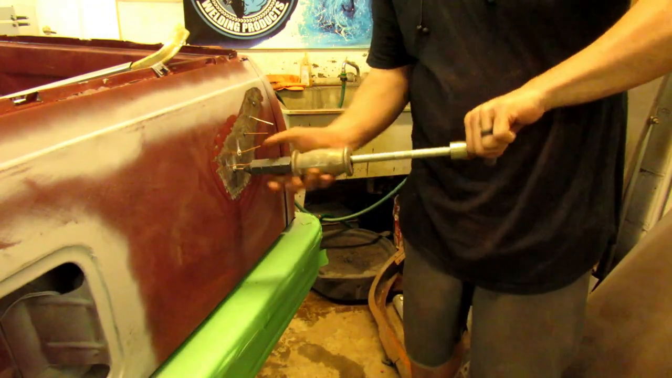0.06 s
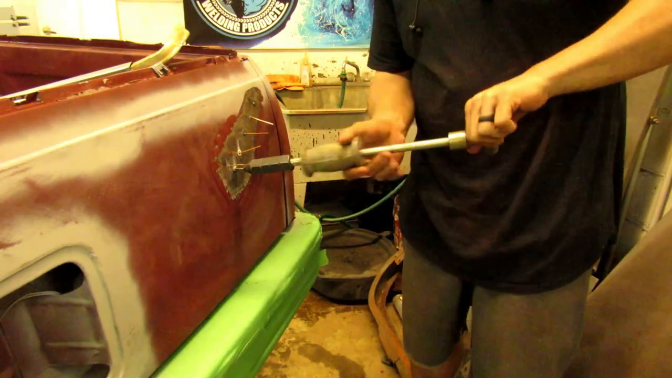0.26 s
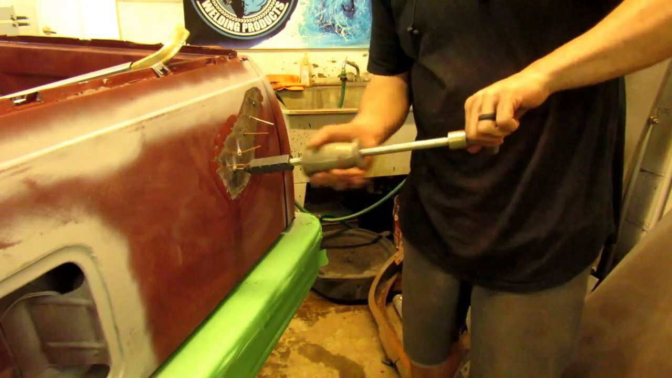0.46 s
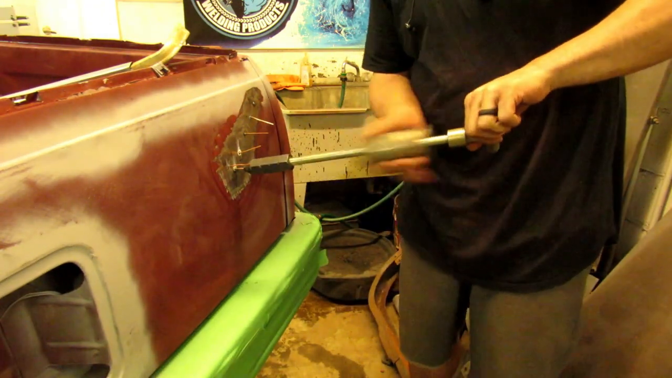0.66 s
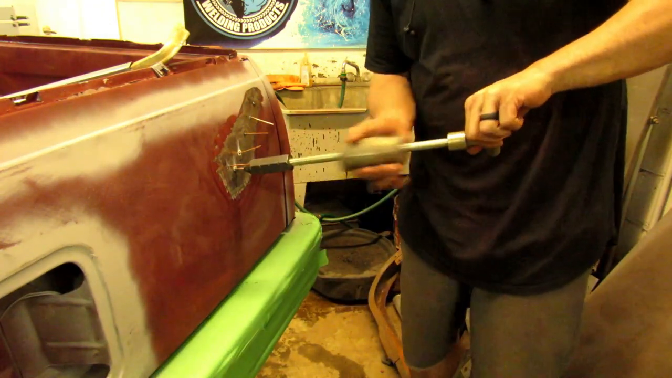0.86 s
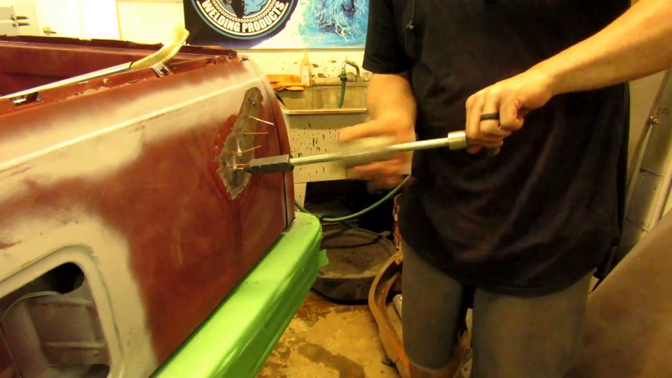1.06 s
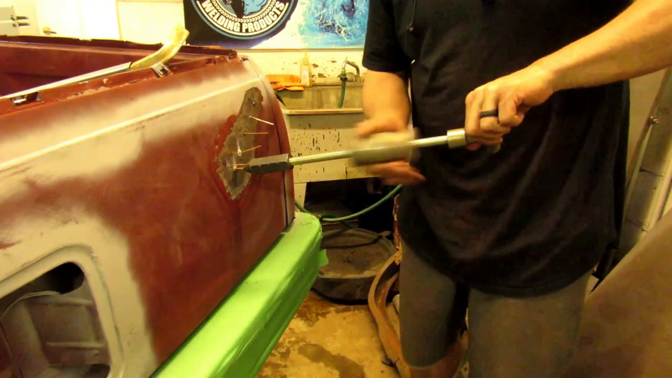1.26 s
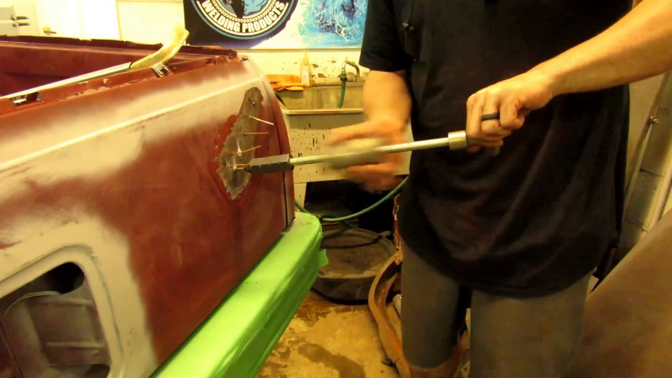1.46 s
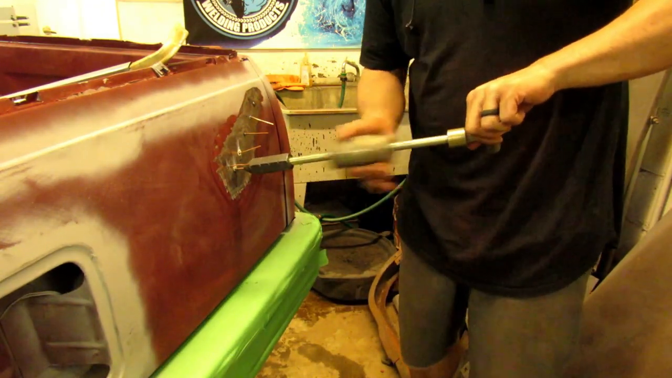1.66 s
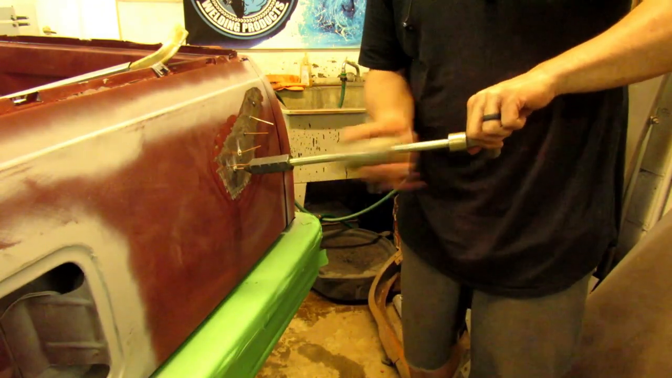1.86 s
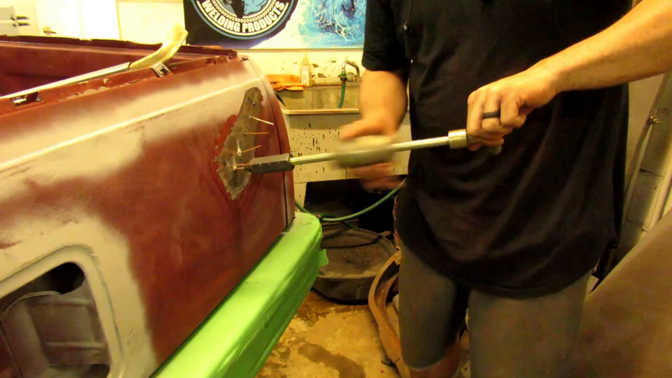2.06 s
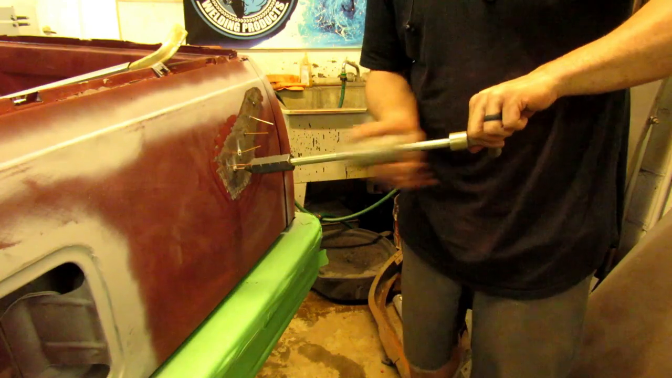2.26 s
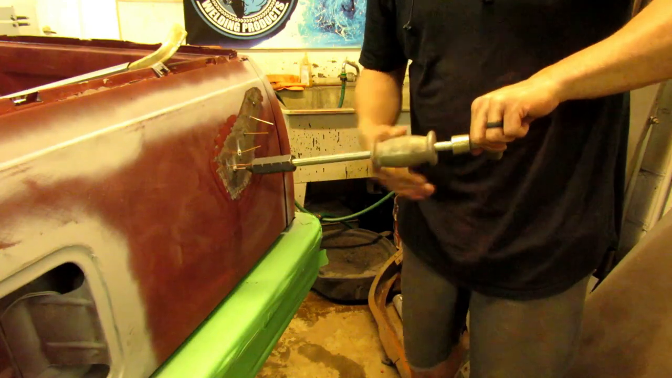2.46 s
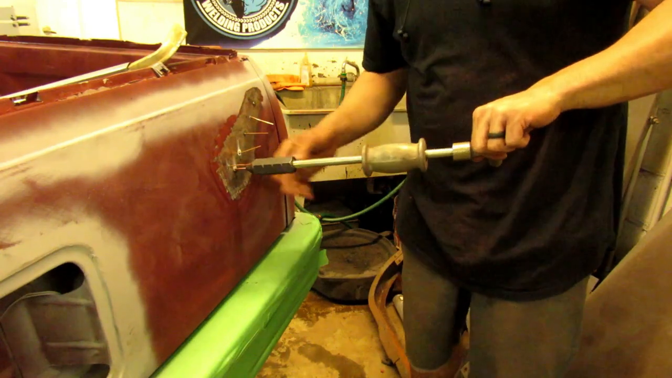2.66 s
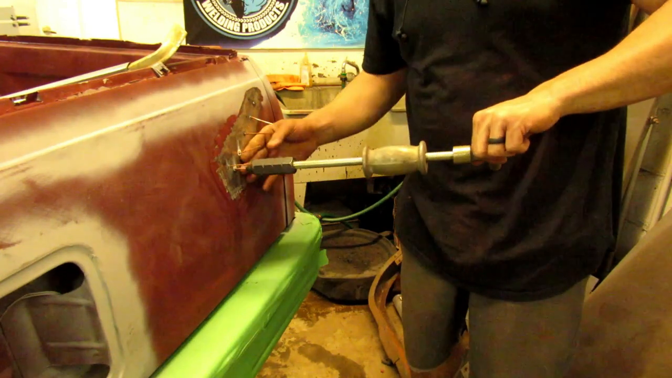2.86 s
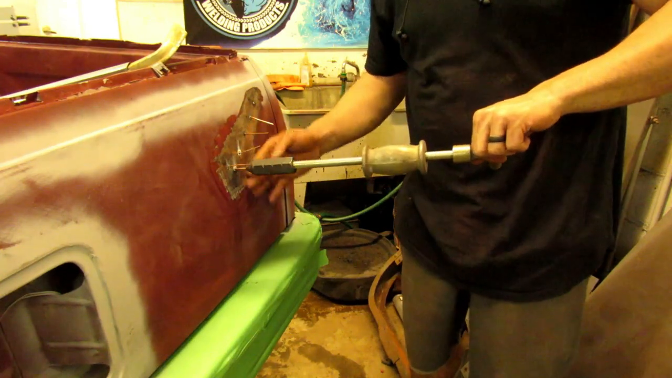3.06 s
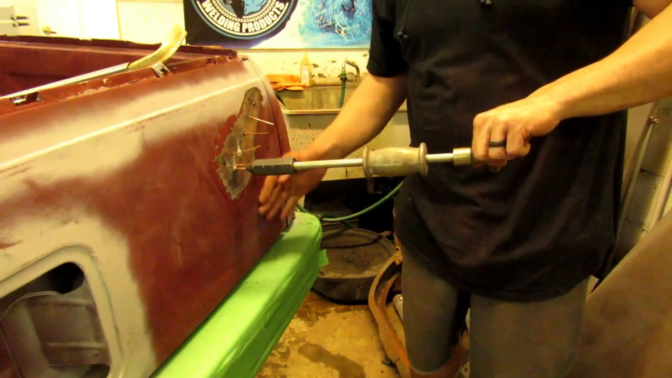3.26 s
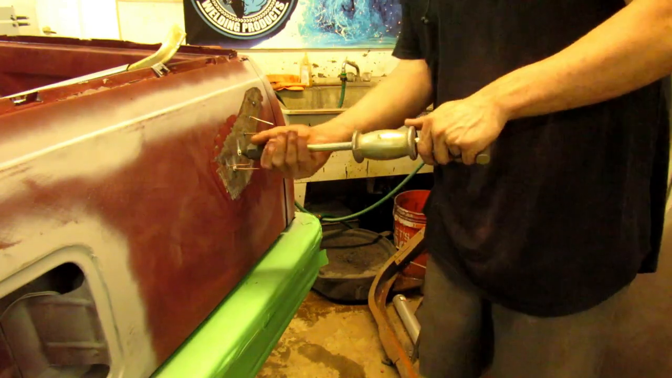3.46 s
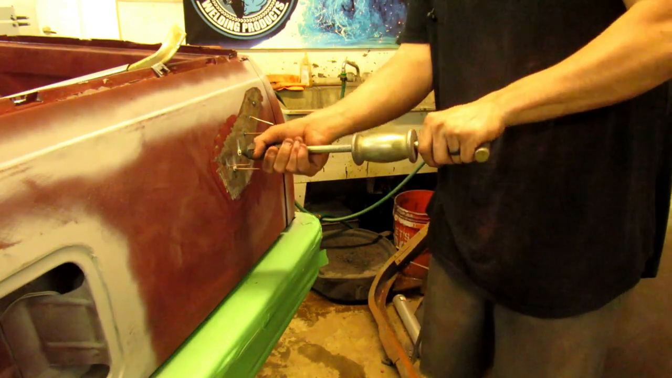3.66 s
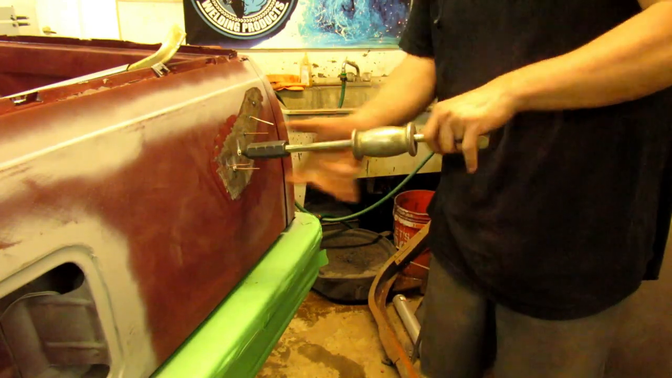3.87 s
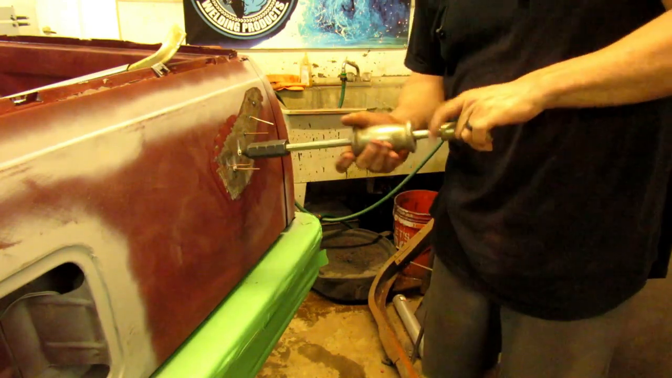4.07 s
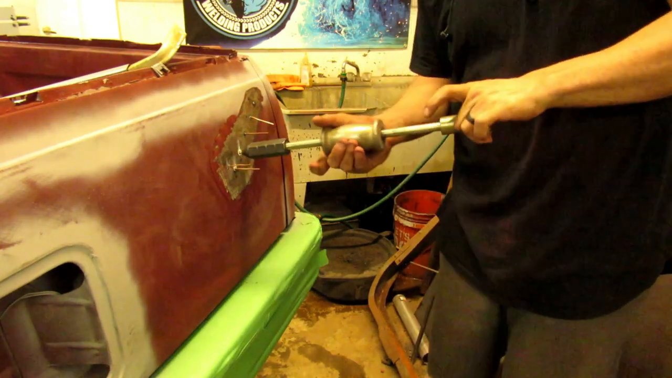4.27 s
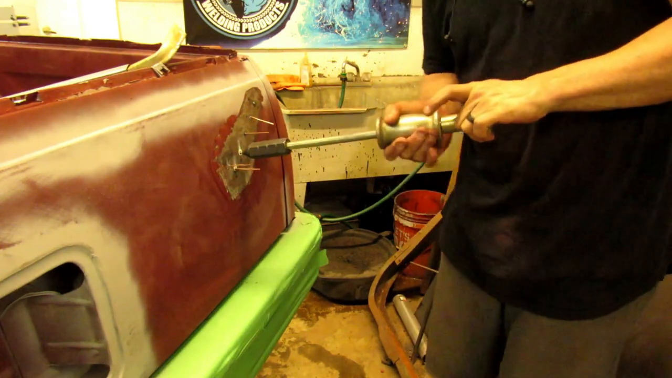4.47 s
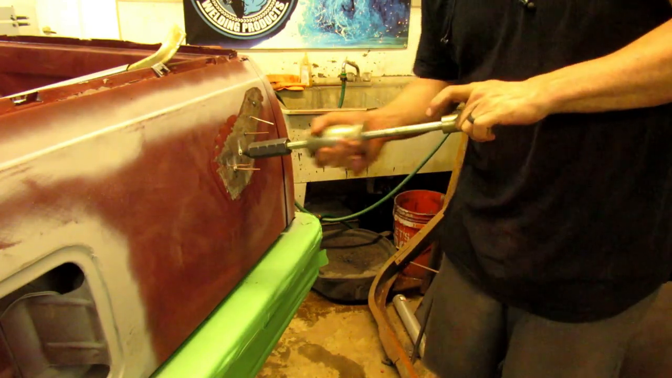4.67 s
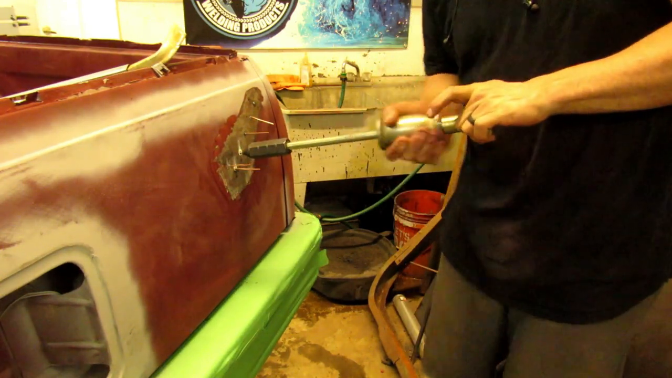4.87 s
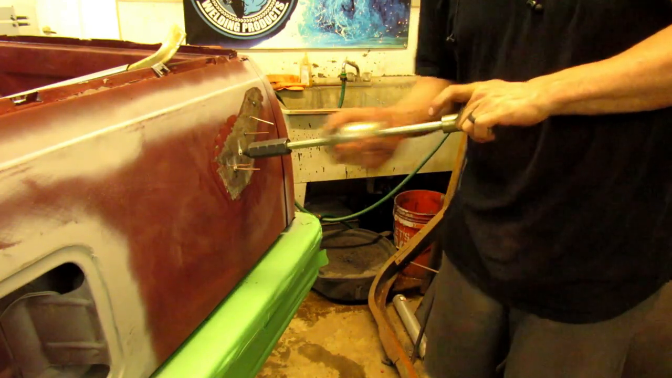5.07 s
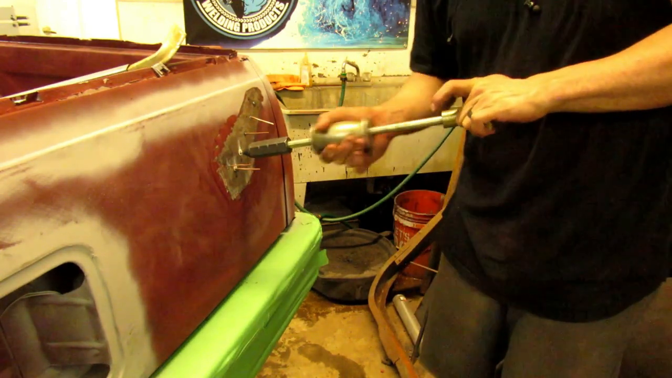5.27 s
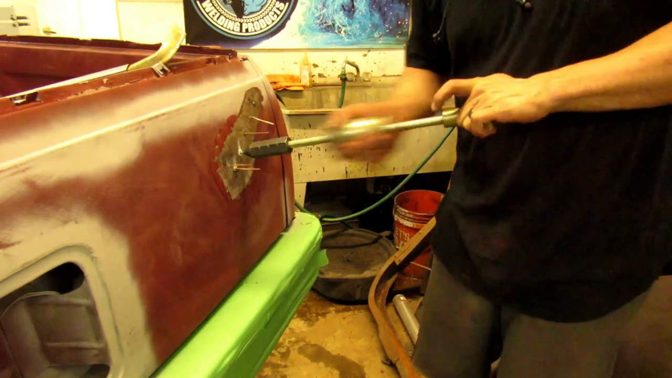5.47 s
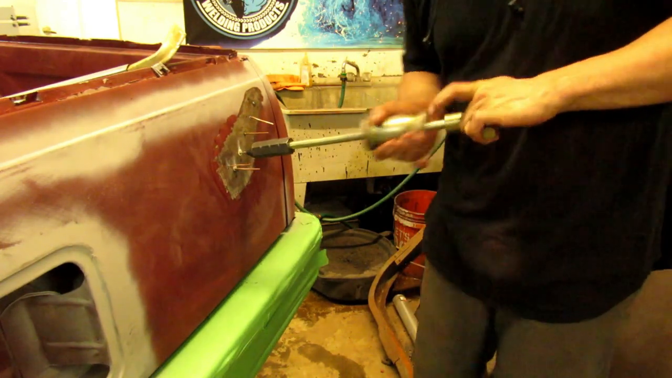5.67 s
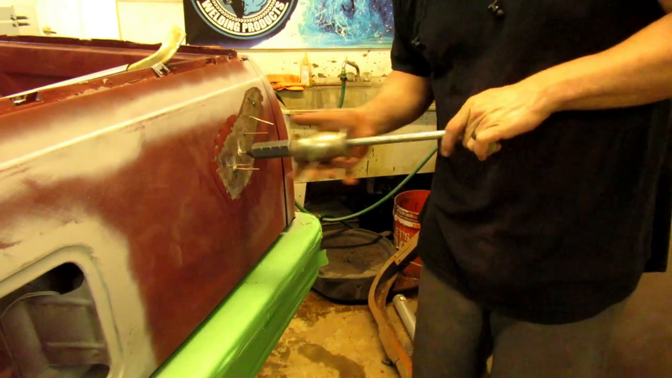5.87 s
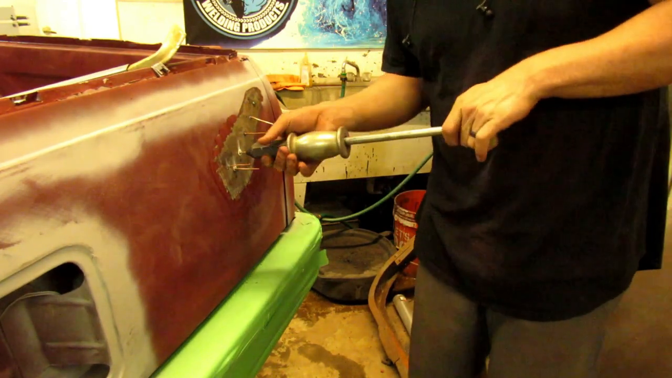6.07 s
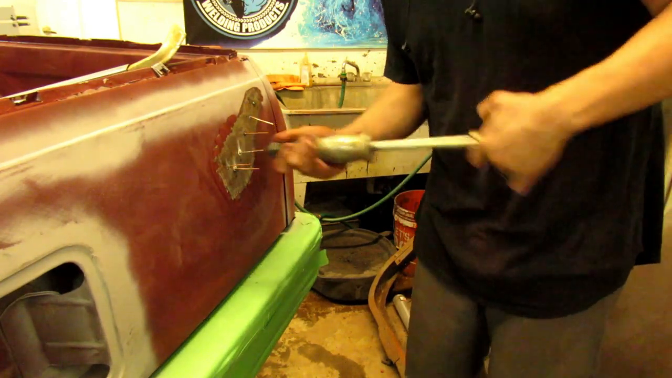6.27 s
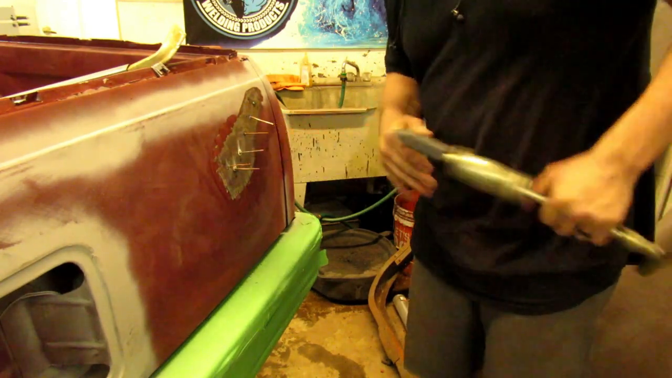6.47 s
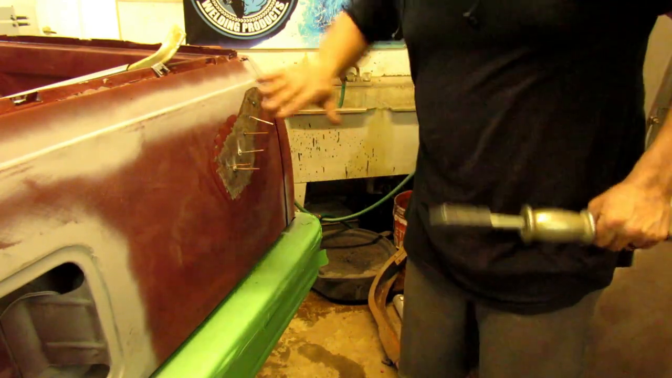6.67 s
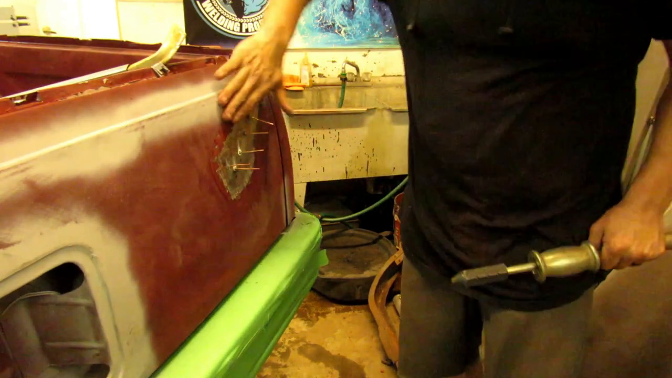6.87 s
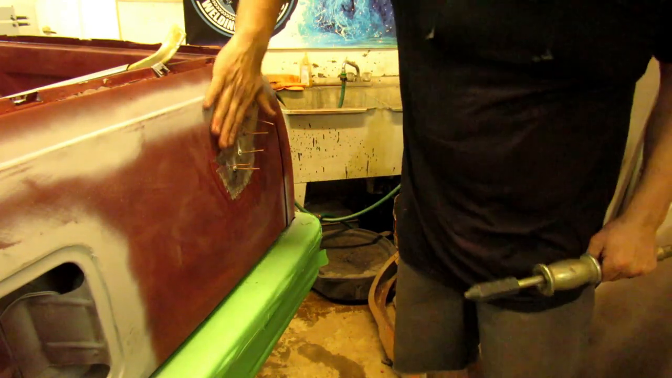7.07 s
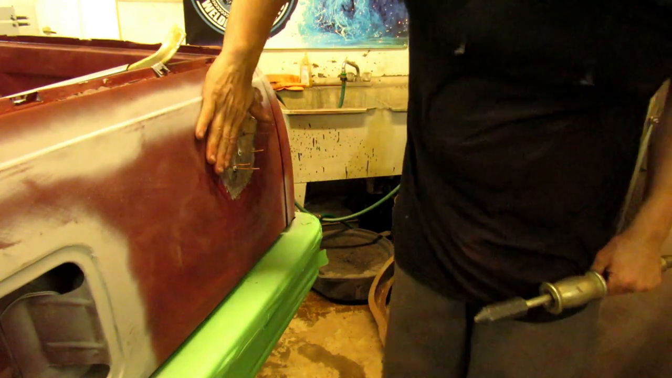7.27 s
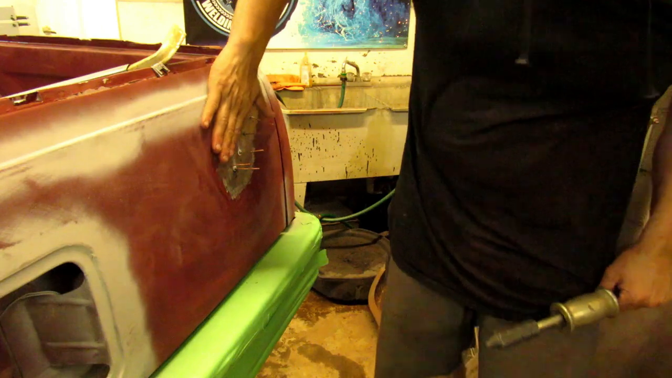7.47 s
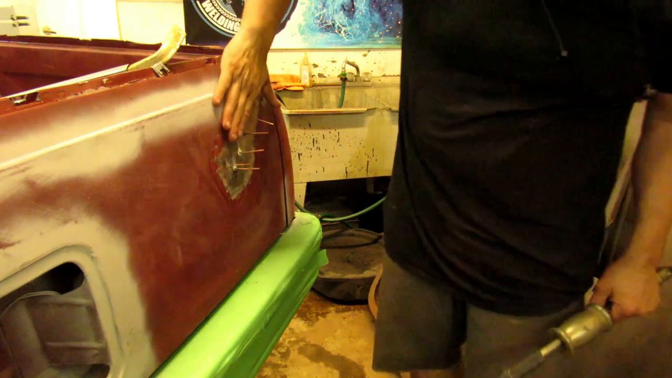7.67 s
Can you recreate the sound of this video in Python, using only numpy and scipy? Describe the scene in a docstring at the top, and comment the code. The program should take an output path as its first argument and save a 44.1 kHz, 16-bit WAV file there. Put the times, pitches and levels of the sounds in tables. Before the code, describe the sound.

Close in a hard, lively workshop over a very faint low hum, skin rubs and steel scrapes drily. Light double knocks at 0.25 and 0.5 seconds mix with short groans and thin squeals. Then a slide hammer slams at 0.66, 1.08, 1.49, 1.88 and 2.27: explosive bright cracks, slightly overloaded, with brief rod ring, low panel boom, clashing sheet and about a second of room tail. Small clacks rattle between them. The ringing dies away; a faint pin twang at 3.26 precedes soft dragging, dull bumps and tiny squeaks until 4.3. A full blow lands at 4.40, then softer ones at 4.86, 5.13, 5.37 and 5.60, quickening and strengthening, the weight singing more. A knock follows at 5.89, with brief scraping. At 6.28 the tool slips off a pin with a mellow, beating twang around 450 hertz, very faint again at 6.5. Barely audible palm hisses from 6.85 to the end near 7.7.

```python
"""A faint rub of skin and a dry scrape of steel come first, then knocks and squeaks, then a slide hammer's blows.
It pulls a dent out of a steel car panel in a workshop: five blows on one welded pin, five on the next.
At each blow the weight slams into its stop: noise bursts and fading sine tones make the crack and ringing rod,
the booming, clashing sheet and the answering room. Between blows the tool knocks and rattles, as bursts and tones;
scrapes are filtered runs of tiny impacts. At the end the tool slips off a twanging pin and a palm hisses on the panel."""
import sys
import numpy as np
from scipy import signal
from scipy.fft import rfft, irfft, next_fast_len
from scipy.io import wavfile
from scipy.ndimage import uniform_filter1d

SR = 44100
rng = np.random.default_rng(int(sys.argv[2]) if len(sys.argv) > 2 else 0)


def log_audio(samples):
    """Write samples as a 16-bit WAV file to the path given in sys.argv[1]."""
    # one column per channel
    frames = np.atleast_2d(samples).T
    # limit to full scale, then quantise
    limited = np.clip(frames, -1, 1)
    pcm = np.round(limited * 32767).astype(np.int16)
    wavfile.write(sys.argv[1], SR, pcm)


N = 340011
TIME = np.arange(N) / SR  # seconds

# All levels in the tables are relative; t60 is the time a sound takes to fade by 60 dB.
# the weight hits the stop: (time [s], steel crack [dB], panel boom [dB], sheet clash [dB])
BLOWS = [(0.6595, 0.5, -12, -15.5), (1.0832, -1, -10, -14), (1.4941, -0.5, -9, -15.5),
         (1.875, 0, -10, -13.5), (2.268, -0.5, -10, -15), (4.3985, 0, -8, -14.5),
         (4.8597, -7.5, -11, -22.5), (5.1307, -5.5, -9.5, -17), (5.372, -4.5, -10, -15.5),
         (5.598, -2, -11, -12.5)]
NEXT_PIN_S = 3  # blows after this time pull at the second pin
# the steel rod: (frequency [Hz], level [dB], t60 [s])
ROD_MODES = [(1046, -1, 0.32), (1630, -10, 0.18), (2006, -5, 0.055), (2230, -3, 0.24), (2890, -1.5, 0.15),
             (2990, -3.5, 0.14), (3457, -6.5, .12), (3870, -5.5, 0.12), (4815, 4, 0.073),
             (5400, -10.5, 0.17), (6060, -1, .12), (6570, 1, 0.099), (7350, -0.5, 0.064),
             (7840, -12.5, .12), (10220, -1.5, .16), (11900, -14, .1)]
# the sliding weight: (frequency [Hz], level [dB], t60 [s])
WEIGHT_MODES = [(2624, -1, .1), (2684, -13.5, 0.52), (2720, 2.5, 0.026), (2930, -8, 0.079),
                (2475, -4.5, 0.05)]
# the panel pulled at the first and at the second pin: (frequency [Hz], level [dB], t60 [s])
PANEL_FIRST_MODES = [(88.5, -24, .4), (114.4, -17, 0.98), (140.6, -12, 0.44), (186, -9.5, 0.44),
                     (212, -9.5, 0.066), (245.6, -7, 0.5), (275.6, -6.5, 0.063), (319, -2, .2),
                     (411, 2.5, 0.065), (455, -7, 0.17), (473, -12, 0.43), (584, -10.5, 0.32),
                     (845, -10, 0.11), (1116, -6.5, .22)]
PANEL_SECOND_MODES = [(84, -20, 0.74), (135, -18.5, 0.95), (201, -4, .18), (241.6, 5.5, 0.27),
                      (261.4, -6.5, 0.33), (338, -1.5, 0.18), (381, 3.5, .14), (420, 1.5, 0.051),
                      (459, -8, 0.062), (588, -5.5, 0.18), (823, -16.5, 0.61), (1096, -13.5, 0.61)]
# first swing of the spot where the pin is welded: (frequency [Hz], level [dB], t60 [s])
TUG_MODES = [(215, -1, 0.11), (439, 2.5, 0.08), (910, -7, 0.048)]
# the panel springing back: (frequency [Hz], level [dB], t60 [s])
REBOUND_MODES = [(258, -3, 0.042), (470, -5, 0.015)]
# steel crack at the stop: (frequency [Hz], level [dB]) and (frequency [Hz], t60 [s])
CRACK_SPECTRUM = [(300, -14), (900, 4.5), (1700, -12), (3000, -2), (4200, -1.5), (6000, -8), (10500, -5),
                  (14000, -14), (16000, -26.5)]
CRACK_T60 = [(1000, 0.01), (3000, 0.011), (6000, 0.012), (12000, .007)]
# clash of the sheet: (frequency [Hz], level [dB]) and (frequency [Hz], t60 [s])
CLASH_SPECTRUM = [(300, -4.5), (520, 6.5), (700, -10.5), (900, 4), (1150, -1), (1400, -0.5), (2700, -1),
                  (4500, -17), (6000, -20), (10000, -20.5), (15000, -29.5)]
CLASH_T60 = [(500, .2), (1500, 0.21), (4000, 0.078), (12000, 0.038)]
# deep boom of the sheet: (frequency [Hz], level [dB]) and (frequency [Hz], t60 [s])
BOOM_SPECTRUM = [(25, -40.5), (55, -26), (90, -12.5), (150, -8.5), (200, -3.5), (250, 2), (330, -4),
                 (470, -2), (600, -14.5), (720, -21), (1100, -19), (2500, -30.5), (6000, -52.5)]
BOOM_T60 = [(60, 0.49), (250, 0.43), (1000, .3)]
# the hollow car body ringing on: (frequency [Hz], level [dB]) and (frequency [Hz], t60 [s])
SHELL_SPECTRUM = [(100, -14), (250, -0.5), (480, 0), (700, -11.5), (1100, 3.5), (1500, -4), (2700, -7),
                  (4500, -5.5), (5600, -9), (7000, -4.5), (10000, -12.5), (15000, -24.5)]
SHELL_T60 = [(200, .9), (1200, 1), (4500, 1), (8000, 0.44), (14000, 0.57)]
# on the first pull at each pin the jaw bites in with a bright snap: (frequency [Hz], level [dB])
BITE_SPECTRUM = [(1500, -29.5), (2500, -14), (2900, 3), (4500, -2), (5200, -14), (9000, -20),
                 (15000, -35.5)]
BITE_DB, BITE_T60_S = -9.5, 0.033
# light knocks of weight and jaw:
# (time [s], tick [dB], panel thud [dB], weight chime [dB], jaw clank [dB])
KNOCKS = [(0.215, -46.5, -28.5, -54, -41.5), (0.258, -27.5, -26.5, -44.5, -38),
          (0.276, -29.5, -23, -39, -35), (0.501, -35, -20, -34.5, -22), (0.524, -21, -23.5, -33.5, -27.5),
          (1.012, -33.5, -36.5, -46, -52), (1.407, -40, -38, -61, -59.5), (1.710, -36, -24, -31, -43),
          (1.803, -36, -43, -50, -53.5), (2.107, -31.5, -25, -31.5, -40), (2.125, -27.5, -22, -28, -36),
          (3.445, -64.5, -24.5, -70.5, -59), (3.922, -59, -31, -68, -54.5), (4.096, -52, -28.5, -63, -40),
          (4.299, -49.5, -25.5, -52, -45), (5.885, -30.5, -24.5, -22, -45)]
# a light tick of steel: (frequency [Hz], level [dB])
TICK_SPECTRUM = [(300, -11), (900, -6), (1800, -1.5), (3200, 0), (5000, 1), (7000, -1.5), (9000, -16.5),
                 (10400, -12), (12000, -21.5), (15000, -24.5)]
# the jaw on its pin: (frequency [Hz], level [dB], t60 [s])
JAW_MODES = [(1700, -6.5, 0.079), (1847, -2.5, .07), (2110, -7.5, .06), (2880, -5, 0.1), (3180, -8.5, 0.1),
             (4090, -11.5, 0.1)]
ROD_PER_TICK_DB = -13.5  # every tick rings the rod in proportion
SLACK_SUSTAIN = 1.5  # between pulls the slack rod rings this many times longer
BOUNCE_S, BOUNCE_DB = .022, -10  # the loose weight touches again, this much later and weaker
# a pin is flicked or let go:
# (time [s], upper mode [dB], lower mode [dB], panel thud [dB], rasp [dB])
TWANGS = [(3.257, -29.5, -49, -31.5, -44), (6.272, -32, -52, -48, -36), (6.283, -17.5, -16.5, -32, -41.5),
          (6.508, -40, -56, -69, -58)]
# a welded pin in its two planes of swing: (frequency [Hz], level [dB], t60 [s])
PIN_UPPER_MODES = [(485, 1, 0.13), (469, -12, 0.78)]
PIN_LOWER_MODES = [(436.3, 2, 0.22), (447, -17, .7)]
# rasp of finger or jaw off the pin: (frequency [Hz], level [dB])
RASP_SPECTRUM = [(300, -4), (550, 3.5), (720, -12.5), (950, 4.5), (1600, -4.5), (2400, -10.5), (3100, -6.5),
                 (4000, -18.5), (8000, -23), (15000, -48)]
# the tool is shifted or the weight dragged along the rod:
# (start [s], end [s], panel rumble [dB], scrape [dB], rod sway [dB], growth [dB/s])
SLIDES = [(-0.02, 0.263, -37, -46.5, -30.5, -5), (0.256, 0.49, -31.5, -36.5, -21, -48.5),
          (0.51, 0.646, -23.5, -34, -18.5, -0.5), (3.286, 3.474, -39.5, -54, -44, 27),
          (3.467, 3.9, -37, -49.5, -36, -18), (3.925, 4.263, -35.5, -53.5, -35, -2.5),
          (4.313, 4.399, -31, -42, -31.5, 132), (5.888, 6.25, -27.5, -39.5, -30, -51)]
# scraping steel: (frequency [Hz], level [dB])
SCRAPE_SPECTRUM = [(400, -5.5), (560, 7.5), (720, 4), (1100, 2.5), (1400, -5), (2000, 2), (3200, -6),
                   (5800, -9), (8000, -13.5), (14000, -24.5), (16000, -32.5)]
# bending tone of the loaded rod: (frequency [Hz], level [dB], t60 [s])
SWAY_MODES = [(198.5, 0, 0.082)]
SLIDE_ATTACK_S, SLIDE_RELEASE_S = .015, .03
RUN_UP_S = 0.053  # the weight's speed grows e-fold in this time before a blow
# steel sticks and slips at a pitch:
# (start [s], end [s], start pitch [Hz], end pitch [Hz], level [dB], roughness [factor])
SQUEAKS = [(0.149, 0.23, 195, 205, -27.5, .2), (0.258, 0.37, 228.6, 194.3, -16.5, .2),
           (0.283, 0.365, 1060, 1067, -34, .1), (0.491, 0.586, 607, 549, -23, 0.3),
           (0.56, 0.663, 546.3, 517, -22, .2), (0.583, 0.665, 5520, 5365, -32, 0.4),
           (0.512, 0.679, 3120, 3420, -34.5, 1.07), (0.57, 0.665, 1894, 2390, -34.5, .6),
           (4.099, 4.173, 1110, 1102, -33, 0.27), (4.098, 4.16, 957, 985, -37.5, .2),
           (4.186, 4.275, 610, 597, -39, 0.3), (4.304, 4.403, 867, 899, -35, .45),
           (4.333, 4.398, 2132, 1905, -41, .8)]
# skin rubs on tool and panel: (start [s], end [s], hiss [dB])
STROKES = [(0.0, 0.25, -60), (0.358, 0.649, -59.5), (3.264, 4.32, -67), (3.73, 3.876, -62.5),
           (6.193, 6.26, -57), (6.846, 7.214, -68), (7.38, 7.711, -67)]
# hiss of the palm: (frequency [Hz], level [dB])
PALM_SPECTRUM = [(350, -34.5), (600, -10.5), (677, -8.5), (1060, -11.5), (1440, -8), (1740, 4), (2430, -4),
                 (10700, -5), (15000, -8.5)]
STROKE_ATTACK_S, STROKE_RELEASE_S = .05, .09
# echoes of the room: (frequency [Hz], level [dB]) and (frequency [Hz], t60 [s])
ROOM_SPECTRUM = [(50, -3), (200, 5.5), (450, 4), (750, 3), (1500, 2.5), (4500, -0.5), (8000, -2),
                 (15000, -9.5)]
ROOM_T60 = [(100, 0.93), (400, 0.95), (1200, 1.0), (4500, 1), (8000, 0.94), (14000, 0.49)]
# how much the echoes differ between left and right: (frequency [Hz], level [dB])
ROOM_WIDTH = [(30, -1.5), (120, -16.5), (500, -13.5), (1200, -11.5), (2200, -17.5), (4000, -13.5),
              (10000, -4.5)]
# the work stands a little to the left: (frequency [Hz], left minus right [dB])
LEFT_DB = [(60, -.4), (200, .3), (450, 1), (700, 1.8), (1300, 1.5), (2400, .4), (4400, 0), (9000, 1)]
# faint low hum of air: (frequency [Hz], level [dB])
AIR_SPECTRUM = [(25, -18), (60, 1), (130, 3.5), (250, 2), (420, 0.5), (700, -19), (1100, -8.5),
                (2500, -20.5), (6000, -28), (15000, -37)]


def undb(db):
    """Turn decibels into a gain factor."""
    return 10 ** (np.asarray(db) / 20)


def unit(x):
    """Scale to an rms (average strength) of 1."""
    return x / np.sqrt(np.mean(x ** 2))


def read(points, hz):
    """Look up a (frequency, value) table, evenly spaced in pitch."""
    f, value = np.transpose(points)
    return np.interp(np.log(hz + 1), np.log(f), value)


def colour(x, spectrum):
    """Make each frequency louder or softer, as a spectrum table says."""
    size = next_fast_len(len(x))
    hz = np.arange(size // 2 + 1) * SR / size
    return irfft(rfft(x, size) * undb(read(spectrum, hz)), size)[:len(x)]


def noise(spectrum, size=N):
    """Steady random hiss with a given spectrum, rms 1."""
    return unit(colour(rng.standard_normal(size), spectrum))


def fade(t60, size=SR):
    """Exponential decay: down 60 dB after t60 seconds."""
    return np.exp(-np.log(1000) * TIME[:size] / t60)


def wash(spectrum, decays, size=SR):
    """Countless overlapping modes: noise whose octaves each die at their own rate."""
    bins = rfft(noise(spectrum, size))
    octave = np.log2(np.clip(np.arange(len(bins)) * SR / size, 32, 16384))
    total = np.zeros(size)
    for k in range(5, 15):  # bands centred on 32 Hz to 16384 Hz, blending into each other
        band = irfft(bins * np.maximum(1 - abs(octave - k), 0), size)
        total += band * fade(read(decays, 2. ** k), size)
    return total


def ring(modes, detune=0.0023, sustain=1):
    """Fading sine tones of a struck body; the grip shifts them a little on every hit."""
    shifts = 1 + detune * rng.standard_normal(len(modes))
    total = np.zeros(SR)
    for k, (hz, db, t60) in enumerate(modes):
        tone = np.sin(2 * np.pi * hz * shifts[k] * TIME[:SR])
        total += (-1) ** k * undb(db) * fade(t60 * sustain) * tone
    return total


def add(track, s, sound):
    """Mix a sound in at time s."""
    start = max(int(s * SR), 0)
    track[start:start + len(sound)] += sound[:N - start]


def drive(force, response):
    """What a body gives off under a running force, rms 1."""
    return unit(signal.fftconvolve(force, response)[:N])


def gesture(start, end, attack_s, release_s):
    """Loudness of one movement: it sets in, holds, and dies away after its end."""
    onset = np.clip((TIME - start) / attack_s, 0, 1)
    return onset * np.exp(-np.maximum(TIME - end, 0) / release_s)


def blows():
    """The stop cracks and rings; the jerk runs down the rod, tugs at the pin and sets the whole sheet going."""
    out = np.zeros(N)
    # bending waves need a moment to spread over the sheet, the long ones most
    clash_swell, boom_swell = 1 - fade(.014), 1 - fade(0.043)
    for s, crack_db, boom_db, clash_db in BLOWS:
        first = s < NEXT_PIN_S
        crack = wash(CRACK_SPECTRUM, CRACK_T60)
        crack += undb(-13.5) * noise(CRACK_SPECTRUM, SR) * fade(0.063)
        crack *= 1 - fade(0.0033)  # a very short rise
        steel = undb(-2.5) * crack + undb(-30.5) * ring(ROD_MODES)
        # the looser grip at the second pin lets the weight sing
        chime = undb(-27.5 if first else -19) * ring(WEIGHT_MODES, detune=0.006)
        # the panel clashes briefly, then the whole hollow car body rings on
        clash = wash(CLASH_SPECTRUM, CLASH_T60) + undb(-15) * wash(SHELL_SPECTRUM, SHELL_T60)
        panel = ring(PANEL_FIRST_MODES if first else PANEL_SECOND_MODES, detune=.008)
        boom = undb(-7.5) * panel + undb(-3.0) * wash(BOOM_SPECTRUM, BOOM_T60)
        tug = undb(-5 if first else 0) * ring(TUG_MODES, detune=.025)
        sheet = undb(boom_db) * (tug + boom_swell * boom) + undb(clash_db) * clash_swell * clash
        add(out, s, undb(crack_db) * steel + chime + sheet)
        if first:  # the stiff spot springs back with a second thump
            add(out, s + .023, undb(boom_db) * ring(REBOUND_MODES))
    return out


def bites():
    """The jaw snaps tight on each fresh pin: a short burst of bright noise."""
    out = np.zeros(N)
    times = [s for s, *_ in BLOWS]
    for s in times[0], min(s for s in times if s > NEXT_PIN_S):
        add(out, s, undb(BITE_DB) * noise(BITE_SPECTRUM, SR) * fade(BITE_T60_S))
    return out


def knocks():
    """The weight comes back against the jaw and bounces once, or the jaw shifts on its pin."""
    out = np.zeros(N)
    for s, tick_db, thud_db, chime_db, jaw_db in KNOCKS:
        tick = noise(TICK_SPECTRUM, SR) * fade(.04) + undb(-13.5) * wash(SHELL_SPECTRUM, SHELL_T60)
        tick += undb(ROD_PER_TICK_DB) * ring(ROD_MODES, sustain=SLACK_SUSTAIN)
        # the sheet takes up the push gradually
        thud = wash(BOOM_SPECTRUM, BOOM_T60) * (1 - fade(0.026))
        add(out, s, undb(tick_db) * tick + undb(thud_db) * thud)
        for delay_s, touch_db in (0, 0), (BOUNCE_S, BOUNCE_DB):
            chime = undb(chime_db) * ring(WEIGHT_MODES, detune=.006)
            clank = undb(jaw_db) * ring(JAW_MODES, detune=0.014)
            add(out, s + delay_s, undb(touch_db) * (chime + clank))
    return out


def twangs():
    """A finger or the jaw rasps off a welded pin; it swings in two planes, whose tones beat."""
    out = np.zeros(N)
    release = 1 - fade(.016)  # a soft start
    for s, upper_db, lower_db, thud_db, rasp_db in TWANGS:
        pin = undb(upper_db) * ring(PIN_UPPER_MODES, detune=.002)
        pin += undb(lower_db) * ring(PIN_LOWER_MODES, detune=0.0016)
        rasp = undb(rasp_db) * noise(RASP_SPECTRUM, SR) * fade(0.32)
        thud = undb(thud_db) * wash(BOOM_SPECTRUM, BOOM_T60)
        add(out, s, release * (pin + rasp + thud))
    return out


def grit(rate=2500, spread_db=2):
    """Sticking and slipping steel: a dense run of uneven little impacts, rate per second."""
    hits = rng.random(N) < rate / SR
    return hits * rng.standard_normal(N) * undb(spread_db * rng.standard_normal(N))


def slides():
    """Friction of the weight shakes the rod, and through the pin the panel; it grows or wanes with the push."""
    rumble = unit(colour(grit(rate=6700), BOOM_SPECTRUM))
    sway = drive(grit(spread_db=4), ring(SWAY_MODES))
    scrape = unit(colour(grit(rate=5400, spread_db=2.5), SCRAPE_SPECTRUM))
    scrape += undb(-10.5) * drive(grit(), ring(ROD_MODES))
    scrape += undb(-8.5) * drive(grit(), ring(JAW_MODES))
    voices = undb(-2.0) * rumble, undb(-6.5) * scrape, undb(-5) * sway
    out = np.zeros(N)
    for start, end, *levels, growth_db_per_s in SLIDES:
        growth = undb(growth_db_per_s * np.clip(TIME - start, 0, end - start))
        push = gesture(start, end, SLIDE_ATTACK_S, SLIDE_RELEASE_S) * growth
        out += push * sum(undb(db) * voice for db, voice in zip(levels, voices))
    # before each blow the weight gathers speed along the rod
    speed = sum(np.exp(-abs(s - TIME) / RUN_UP_S) * (TIME < s) for s, *_ in BLOWS)
    return out + speed * (undb(-33.5) * rumble + undb(-44) * scrape)


def squeaks(wobble=.13):
    """Short groans and squeals of dry steel; uneven slips make the pitch wander."""
    out = np.zeros(N)
    for start, end, start_hz, end_hz, db, rough in SQUEAKS:
        size = int((end - start) * SR)
        wander = unit(uniform_filter1d(rng.standard_normal(size), size=30))
        hz = np.linspace(start_hz, end_hz, size) * (1 + wobble * rough * wander)
        tone = np.sin(2 * np.pi * np.cumsum(hz) / SR)
        add(out, start, undb(db) * signal.windows.tukey(size, .5) * tone)
    return out


def strokes():
    """Skin hisses over steel and sanded paint and stirs the sheet faintly."""
    pressure = np.zeros(N)
    for start, end, db in STROKES:
        pressure += undb(db) * gesture(start, end, STROKE_ATTACK_S, STROKE_RELEASE_S)
    return pressure * (undb(2.5) * noise(PALM_SPECTRUM) + undb(-4.5) * noise(BOOM_SPECTRUM))


def echo(x, tail):
    """Spread a sound out over a tail of echoes of unit energy."""
    return signal.fftconvolve(x, tail / np.linalg.norm(tail))[:N]


def workshop(x, wet_db, near_db):
    """A hard-walled room heard by two closely spaced capsules; echoes off the car body differ between them."""
    size = 2 * SR
    build_up = 1 - fade(0.06, size)
    mid = echo(x, wash(ROOM_SPECTRUM, ROOM_T60, size) * build_up)
    side = echo(x, wash(ROOM_SPECTRUM, ROOM_T60, size) * build_up)
    near = echo(x, rng.standard_normal(SR) * fade(.08))  # short echoes off the car body
    side = colour(undb(wet_db) * side + undb(near_db) * near, ROOM_WIDTH)
    return x + undb(wet_db) * mid + np.outer([1, -1], side)  # left, right


def room_air():
    """A faint low hum of air: one noise shared by both ears and one opposite in them."""
    shared, opposite = noise(AIR_SPECTRUM), noise(AIR_SPECTRUM)
    return undb(-63.5) * (shared + undb(-5.5) * np.outer([1, -1], opposite))


def scene():
    """All the work in the room, slightly to the left, over a faint low hum of air."""
    work = blows() + bites() + knocks() + twangs() + slides() + squeaks() + strokes()
    left, right = workshop(work, wet_db=-12.5, near_db=-0.5)
    return np.array([colour(left, LEFT_DB), right]) + room_air()


def record(dry):
    """The microphone sheds the deepest bass; the hardest cracks overload the recorder; the top is cut."""
    bass_cut = signal.butter(1, 25, "highpass", fs=SR, output="sos")
    heard = signal.sosfilt(bass_cut, dry)
    top_cut = signal.ellip(8, .2, 70, 15100, fs=SR, output="sos")  # low-pass at 15100 Hz
    return signal.sosfilt(top_cut, np.clip(heard, -1, 1))


dry = scene()
out = record(dry)
log_audio(out)
```